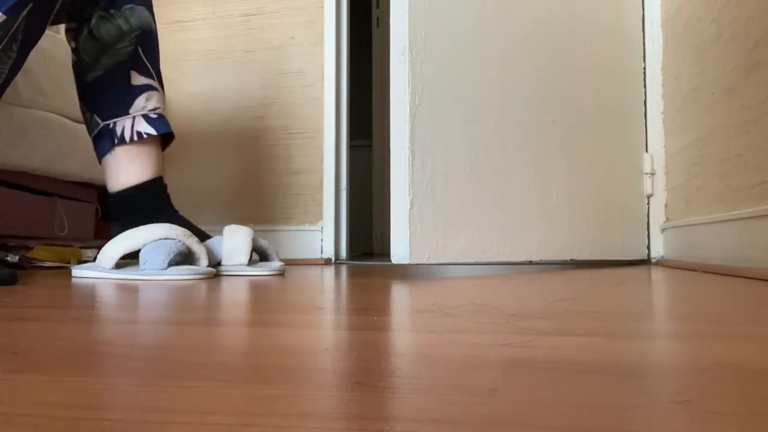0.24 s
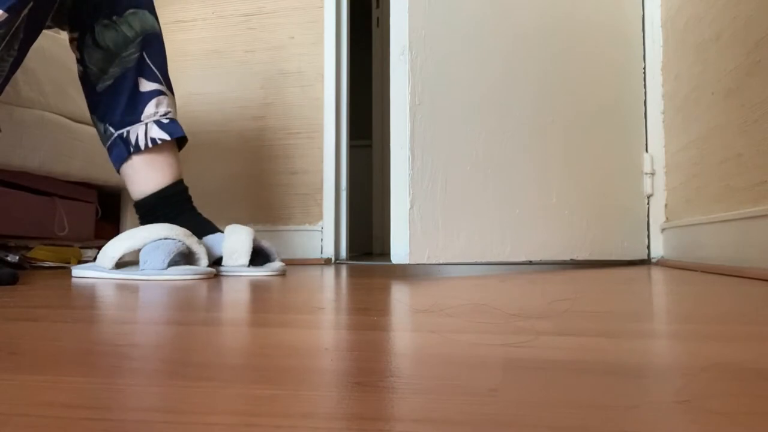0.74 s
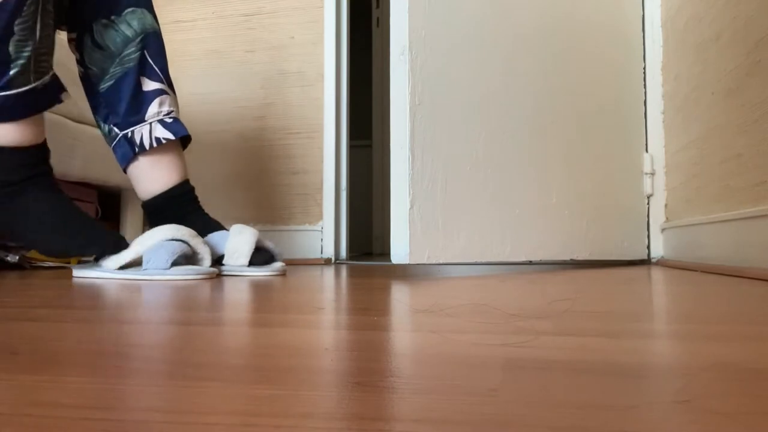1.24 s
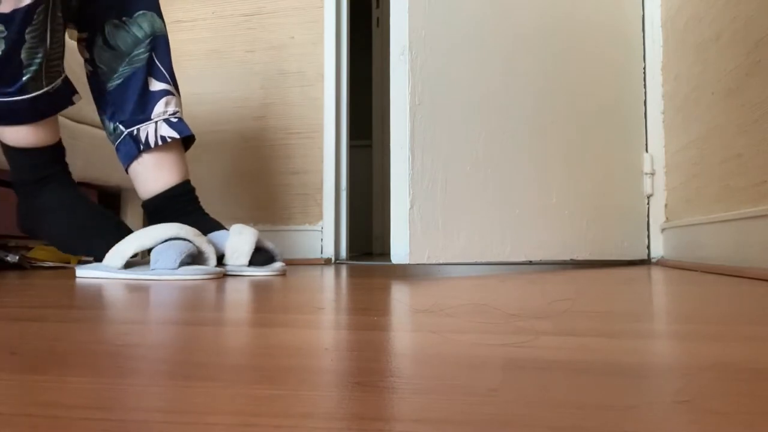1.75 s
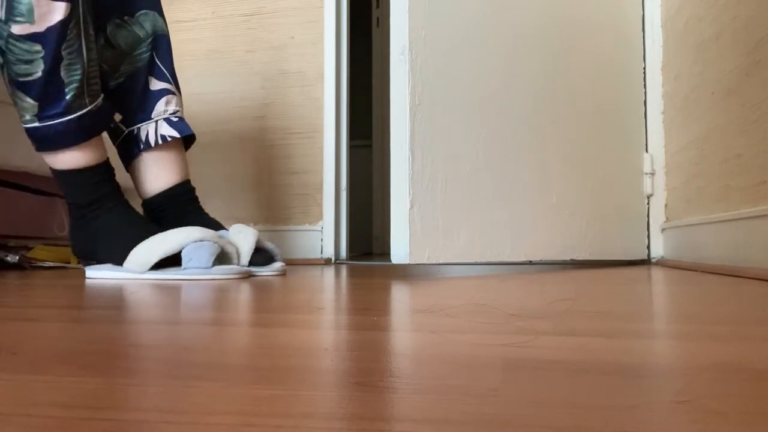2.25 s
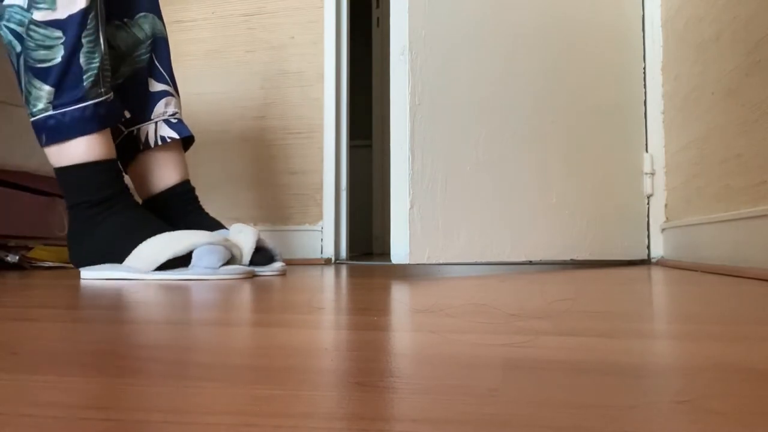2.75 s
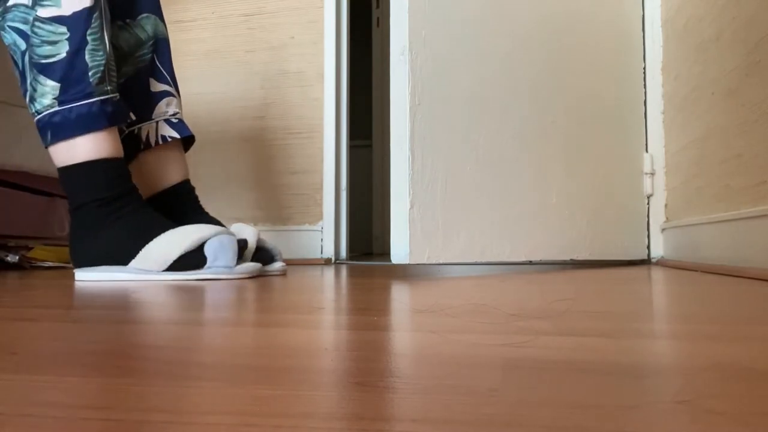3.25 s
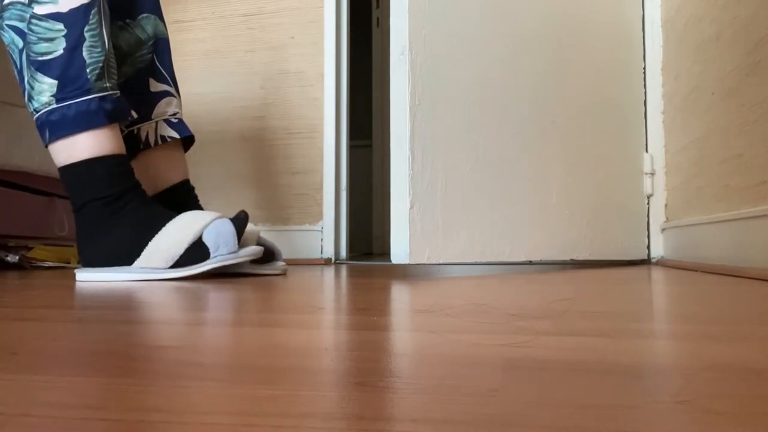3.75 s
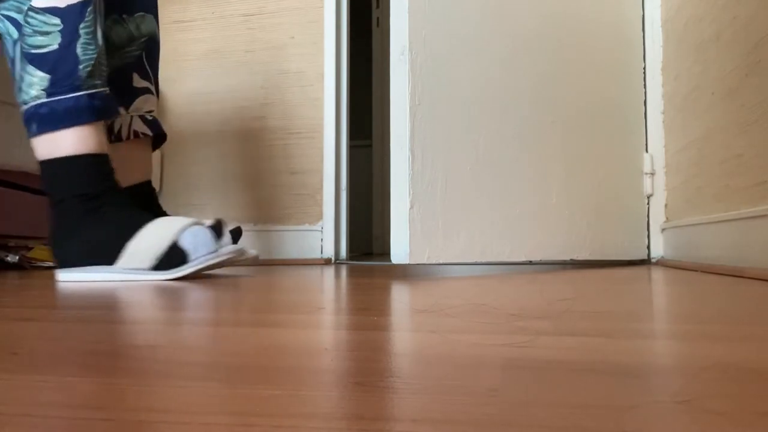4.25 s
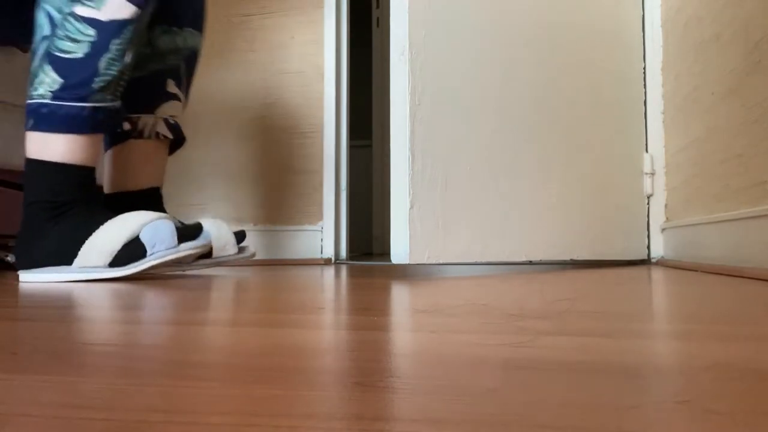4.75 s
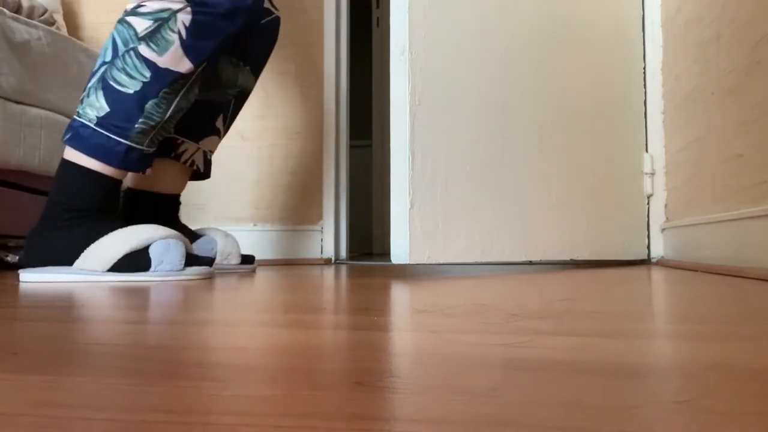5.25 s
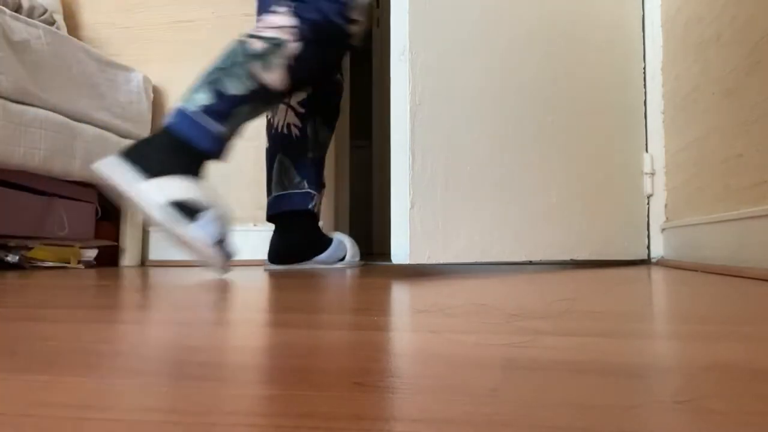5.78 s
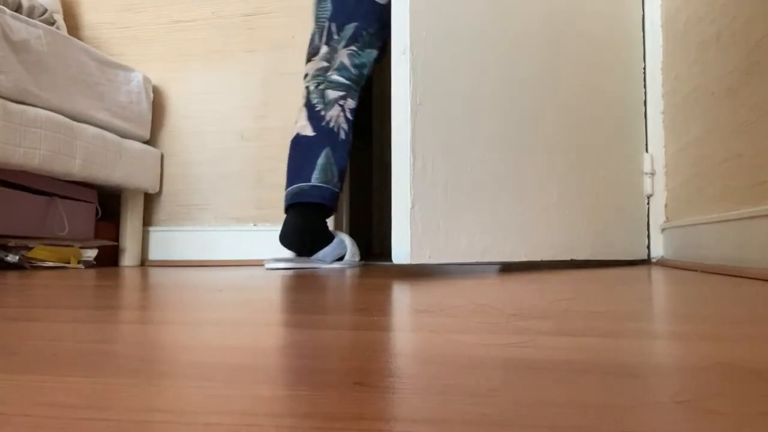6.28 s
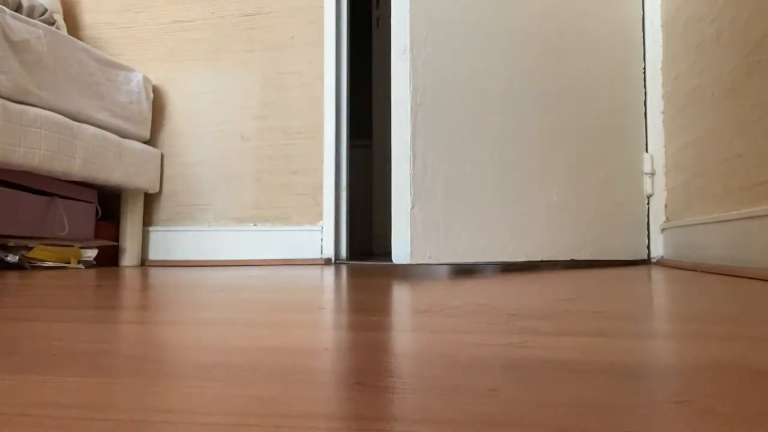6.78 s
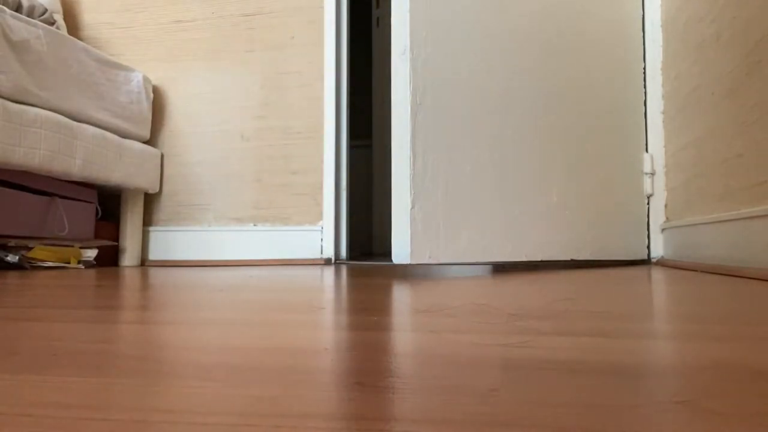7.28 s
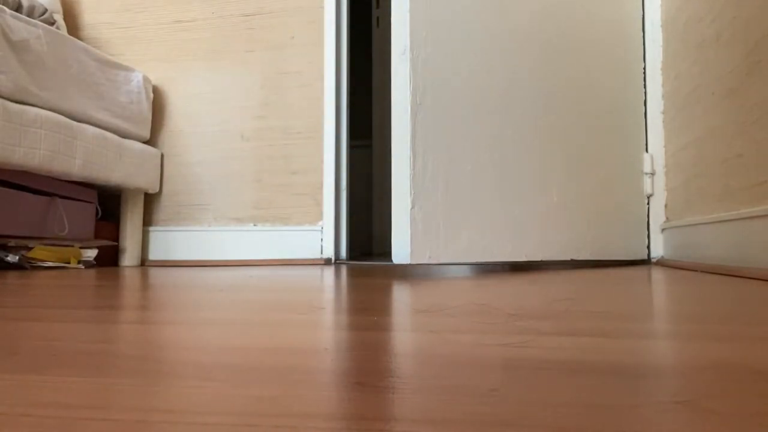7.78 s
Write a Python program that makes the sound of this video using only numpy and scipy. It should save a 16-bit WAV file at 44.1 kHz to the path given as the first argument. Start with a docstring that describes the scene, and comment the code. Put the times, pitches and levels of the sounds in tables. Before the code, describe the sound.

Two microphones near the floor catch very quiet fabric hisses and padded thuds as feet slide into slippers. Joints in the boards tick and crack midway and again before walking begins. Then come quick gritty scuffs, light slaps and a crisp double clack, followed by softer steps moving off. The small room answers with a short reverberation over a barely audible low traffic drone.

```python
"""Slippers on a laminate floor

Socked feet work their way into soft slippers on a laminate floor, then shuffle off across the boards.
Cloth and scuffs are shaped noise; pats, cracks and slaps are short pulses that the boards carry to two
microphones, treble first. The small room rings briefly with decaying noise.
A low drone of swept tones, like an engine outdoors, and a rumble of noise come through the walls."""
import sys
import numpy as np
from scipy import signal
from scipy.fft import rfft, irfft, next_fast_len
from scipy.io import wavfile

SR = 44100
rng = np.random.default_rng(int(sys.argv[2]) if len(sys.argv) > 2 else 0)


def digitize_waveform(pressure):
    """Quantize a signal to 16-bit integers and store it at the path in sys.argv[1].

    Rows of a 2-D input are taken as channels; values are limited to [-1, 1].
    """
    field = np.atleast_2d(pressure).T
    bounded = np.clip(field, -1, 1)
    quanta = np.round(bounded * 32767).astype(np.int16)
    wavfile.write(sys.argv[1], SR, quanta)


N = 353814
TIME = np.arange(N) / SR

# Drone like a distant engine. Each row: time in seconds, pitch in Hz, relative level in dB.
DRONE = [(0, 33.06, -65), (.78, 34, -68), (.9, 35.24, -52.5), (1.08, 36.55, -47.5), (1.42, 37.66, -50),
         (1.52, 39.8, -54.5), (2.05, 45, -55), (2.6, 47.4, -50), (3.0, 47.3, -51), (3.18, 46.9, -55.5),
         (3.42, 45.67, -45), (3.75, 46.23, -50), (4.15, 45, -64.5), (6.3, 45.3, -56), (8.02, 45, -68)]
# Resonances through which the drone enters the room. Each row: pitch in Hz, width in Hz, gain in dB.
WALL_MODES = [(46.3, 11, -0.5), (71.37, 6.5, 10.5)]
# Low notes of the room, stirred by traffic. Each row: pitch in Hz, width in Hz, relative level in dB.
ROOM_MODES = [(45, 1.5, -62), (67.64, 4.7, -54.5), (78.7, 9.6, -60), (152, 5.1, -64.5), (177.9, 9.9, -67)]
# Strength of the traffic over time. Each row: time in seconds, relative level in dB.
TRAFFIC = [(.2, -52.5), (.75, -64.5), (2.0, -57.5), (2.6, -55.5), (4.15, -60), (4.55, -52.5), (5.9, -59.5),
           (6.7, -51), (7.3, -57), (8.02, -53.5)]
# Tone of the faint room noise. Each row: frequency in Hz, relative level in dB.
AIR_COLOUR = [(50, -21.5), (90, -6), (125, -9), (180, -19), (280, -18), (400, -25), (800, -27.5),
              (1300, -35), (2300, -44.5), (5000, -50), (10000, -49), (15000, -58)]
# Soles dragged over the boards. Each row: fastest moment in seconds, length in seconds,
# relative level in dB, pitch of the hollow body in Hz, grip in dB.
SCUFFS = [(.008, 0.013, -61.5, 600, 2), (0.132, 0.047, -75, 1300, -12), (0.226, 0.035, -65.5, 600, 9.5),
          (0.264, 0.014, -64, 990, -8), (0.48, 0.094, -75, 1200, -8), (0.586, 0.0081, -64, 550, 5.5),
          (1.349, 0.068, -81.5, 600, 12.5), (1.992, 0.082, -70.5, 646, 5.5), (3.412, 0.042, -70, 1650, -2),
          (4.326, 0.094, -59, 695, -3), (4.431, 0.013, -60, 2440, -6), (4.447, 0.039, -69.5, 974, -23),
          (5.412, 0.045, -57.5, 806, 10), (5.433, 0.017, -47.5, 1410, -12.5),
          (5.452, 0.015, -45.5, 1800, 1), (5.473, 0.054, -58.5, 600, -8), (5.54, 0.041, -44.5, 1050, 5.5),
          (5.583, 0.027, -51.5, 640, 7), (5.653, 0.078, -63, 655, -2.5), (6.007, 0.058, -68, 660, 2.5),
          (6.234, 0.063, -59.5, 870, -8.5), (6.515, 0.066, -73, 600, 10.5),
          (6.724, 0.042, -85.5, 842, -20.5), (7.141, 0.027, -51.5, 740, 5), (7.185, 0.0094, -47, 1650, 8.5),
          (7.367, 0.073, -72, 3013, -2.5), (7.834, 0.048, -70.5, 470, -13), (7.972, 0.027, -55, 685, -5)]
# Tone of the scuffing grit. Each row: frequency in Hz, relative level in dB.
SCUFF_COLOUR = [(120, -38.5), (200, -21.5), (390, -1.5), (580, -3.5), (880, -4.5), (1700, -8), (2400, -9),
                (4000, -14.5), (5500, -16.5), (8800, -18), (13000, -28), (15000, -40.5)]
# Socks and trousers sliding. Each row: fastest moment in seconds, length in seconds, relative level in dB.
STROKES = [(.135, 0.091, -78.5), (0.236, 0.039, -59.5), (.5, 0.11, -73), (0.608, 0.054, -76),
           (0.76, 0.053, -70.5), (0.879, 0.091, -66.5), (1.075, 0.098, -72.5), (1.353, .053, -73),
           (1.995, 0.098, -69), (2.221, 0.074, -63), (2.453, 0.11, -64), (2.652, 0.049, -66.5),
           (2.868, 0.13, -64), (3.134, 0.059, -65.5), (3.205, 0.068, -68.5), (3.309, 0.076, -73),
           (3.437, 0.12, -63), (3.598, 0.02, -67), (3.692, 0.094, -68), (3.834, 0.028, -70.5),
           (3.91, 0.029, -71), (4.072, 0.22, -71.5), (4.337, 0.16, -56.5), (4.572, 0.05, -62.5),
           (4.718, 0.1, -67.5), (4.798, 0.19, -60.5), (4.936, 0.12, -69), (5.096, 0.11, -64),
           (5.311, 0.14, -68.5), (5.779, 0.081, -60), (6.013, 0.083, -72.5), (6.479, 0.14, -67),
           (7.19, 0.059, -57), (7.277, 0.18, -68.5)]
# Tone of the cloth's hiss. Each row: frequency in Hz, relative level in dB.
HISS_COLOUR = [(600, -15.5), (1200, 2), (2000, 2), (3500, -3.5), (5700, -7.5), (8300, -5.5), (11500, -14.5),
               (13500, -14), (15000, -28.5)]
# Tone of the low rub on the padded soles. Each row: frequency in Hz, relative level in dB.
RUB_COLOUR = [(100, -24), (220, 0.5), (390, -3), (500, -5.5), (680, -0.5), (1000, -3.5), (1700, -6.5),
              (2600, -16), (5000, -63)]
# Board joints cracking under the weight. Each row: time in seconds, relative level in dB, knock pitch in Hz.
CRACKS = [(2.991, -45.5, 1130), (3.286, -52.5, 1000), (3.342, -48.5, 1300), (3.3626, -37, 984),
          (3.382, -43.5, 1470), (3.4014, -35, 1370), (3.415, -50, 1400), (4.735, -35, 1930),
          (4.738, -30.5, 1350), (4.752, -41, 1400), (4.767, -41, 1400)]
# Slippers slapping and flicking the boards. Each row: time in seconds, relative level in dB,
# treble tilt in dB per octave.
SLAPS = [(0.2457, -39, -1), (0.3837, -63, 2), (0.5877, -42, 15), (3.187, -46, 16), (3.819, -54, 5),
         (3.88, -52.5, 1.5), (5.315, -37, -5), (5.453, -39.5, -4), (5.652, -42.5, 3.5), (5.691, -31, -3.5),
         (5.802, -37, 6), (5.814, -37, -1), (6.192, -35, -3.5), (6.3069, -22, 2), (6.3106, -30, -1.5),
         (6.321, -22, 3), (6.3237, -28, 5.5), (7.123, -46.5, -1.5), (7.196, -37, 2.5), (7.956, -35, 0)]
# Tone of a hard contact. Each row: frequency in Hz, relative level in dB.
SNAP_COLOUR = [(150, -11.5), (400, 1), (850, 1.5), (1400, 1), (2100, -2.5), (3000, -2), (5500, -11.5),
               (8000, -11.5), (14000, -32)]
# Soft pats of heel and sole. Each row: time in seconds, relative level in dB, pitch of the thud in Hz.
PATS = [(.2475, -29, 560), (.386, -46.5, 570), (.55, -45.5, 670), (.589, -51, 494.6), (.876, -55.5, 600),
        (1.017, -49.5, 472.6), (1.267, -52, 536), (2.426, -49, 650), (2.604, -48, 580), (2.992, -48, 484),
        (3.133, -51.5, 487), (3.334, -44, 540), (3.472, -47, 720.6), (3.582, -47, 686), (3.918, -53, 618),
        (4.006, -48, 600), (4.887, -49, 563), (4.907, -48, 485), (5.474, -44, 557), (5.653, -51, 630),
        (5.707, -39, 656), (6.24, -45, 850), (6.323, -35, 900), (6.424, -48, 460), (6.705, -47.5, 703),
        (7.065, -44.5, 480), (7.134, -42, 493), (7.151, -43, 480.4), (7.813, -48, 474), (7.936, -42.5, 502),
        (7.959, -39.5, 603)]
# Tone of a pat. Each row: multiple of the thud pitch, relative level in dB.
PAT_COLOUR = [(.16, -29.5), (.32, -14), (.6, -8.5), (.88, -0.5), (1.15, -0.5), (1.7, -16), (2.5, -23.5),
              (4.4, -60), (14, -54.5)]
# The floor takes the body's weight. Each row: heaviest moment in seconds, length in seconds,
# relative level in dB.
LOADS = [(0.256, 0.031, -49), (3.398, 0.027, -47.5), (4.937, 0.15, -56.5), (5.5, 0.19, -55.5),
         (6.23, 0.075, -58.5), (6.356, 0.049, -61), (7.975, 0.033, -60)]
# Tone of the loaded floor. Each row: frequency in Hz, relative level in dB.
LOAD_COLOUR = [(40, -13), (75, 3), (115, 3), (190, -4.5), (280, -3), (500, -43)]
# Where the feet are. Each row: time in seconds, travel time through the boards at 1 kHz in seconds,
# lead of the left microphone in seconds, extra ring of the boards in dB.
FEET = [(3.4, .002, 0.00086, 0.5), (4.7, .0045, 0.0012, 8), (5.7, 0.0044, 0, -4),
        (6.352, .0054, 0.0019, 1.5), (7.0, 0.0031, 0.00054, -6)]
# Resonances of the floor. Each row: pitch in Hz, width in Hz, gain in dB.
BOARDS = [(523, 120, -4.5), (618, 160, -8.5), (4370, 1700, -3.5)]
# How the room dies away. Each row: frequency in Hz, time to fall by 60 dB in seconds, relative level in dB.
ROOM_DECAY = [(150, 0.51, -0.5), (600, 0.43, 2.5), (2030, 0.32, 1.5), (5000, 0.21, 4.5), (14000, 0.25, 3.5)]
# Left minus right sensitivity. Each row: frequency in Hz, difference in dB.
PORT_BALANCE = [(40, -6.5), (70, -3), (130, -6), (500, -7), (1000, -4), (2000, -2), (4000, -2.5),
                (8000, -0.5)]

PORT_LEAD_S = .00028  # lead of the left microphone for cloth and loads
RING_HZ, RING_WIDTH_HZ = 4030, 530  # the bright ring of the laminate
SWELL_SHARE = 0.45  # part of a slide spent speeding up
RUB_DB, RUB_GROWTH = -24, 0.58  # the rub grows more slowly than the hiss: offset in dB, dB per dB
BODY_DB, BODY_PER_GRIP = 9.5, -0.46  # body of a scuff at no grip (dB), and its change per dB of grip
RASP_DB = 11  # rasp of a scuff at a grip of 0 dB, before the ring of the place
CRACK_TILT_DB, CRACK_RING_DB = -6, -3.5  # treble tilt per octave; ring of the boards
SLAP_KNOCK_HZ, SLAP_RING_DB = 880, 7
# an ordinary pat; its edge and its settling relative to the thud (dB); the wait before it settles (s)
PAT_DB, EDGE_DB, SETTLE_DB, SETTLE_AFTER_S = -45, -16, -5.5, .009
EDGE_PER_DB, SETTLE_PER_DB = 0.18, -0.22  # louder pats have more edge and settle less (dB per dB)
EDGE_RING_DB, EDGE_HZ_PER_DB = 3.5, 700.5  # the edge rings a little; padding takes 1 dB per 700.5 Hz
TOP_HZ = 14600


def undb(db):
    """Turn decibels into a gain."""
    return 10 ** (np.asarray(db) / 20)


def unit(x):
    """Scale to an average (rms) strength of 1."""
    return x / np.sqrt(np.mean(x ** 2) + 1e-20)


def curves(rows):
    """Join each column of a table by straight lines in time."""
    times, *columns = np.transpose(rows)
    return [np.interp(TIME, times, column) for column in columns]


def freqs(size):
    """Frequencies in the spectrum of this many samples, at least 1 Hz."""
    return np.maximum(np.fft.rfftfreq(size, 1 / SR), 1)


def along(points, hz):
    """Read a table of frequencies and values on a log-frequency axis."""
    f, value = np.transpose(points)
    return np.interp(np.log(hz), np.log(f), value)


def colour(x, points):
    """Give a sound a tone from a table, with strength 1."""
    return unit(irfft(rfft(x) * undb(along(points, freqs(N))), N))


def resonance(hz, centre, width):
    """Response of one damped vibration, 1 at its centre."""
    return 1 / (1 + 1j * (hz ** 2 - centre ** 2) / (hz * width))


def walk(rate):
    """Smooth random wander with a spread near 1; rate is new values per second."""
    return np.interp(TIME * rate, np.arange(N), rng.standard_normal(N))


def add(track, s, sound):
    """Mix a stereo sound in at a time."""
    i = max(int(s * SR), 0)
    track[:, i:i + sound.shape[1]] += sound[:, :max(N - i, 0)]


def ports(x, lead_s):
    """Two microphones hear a sound a moment apart; a positive lead puts the left one first."""
    late = np.pad(x, (int(round(abs(lead_s) * SR)), 0))[:len(x)]
    return np.array([x, late] if lead_s > 0 else [late, x])


def feet(s):
    """Travel time, left lead and ring of the boards for where the feet are."""
    times, *columns = np.transpose(FEET)
    return [np.interp(s, times, column) for column in columns]


def stroke(s, length):
    """Speed of one slide: it swells to 1 and fades."""
    speed = np.zeros(N)
    near = slice(*np.searchsorted(TIME, [s - .5, s + .5]))
    t = TIME[near] - s
    share = np.clip(SWELL_SHARE, .1, .9)
    width = length * np.where(t < 0, share, 1 - share)
    speed[near] = np.exp(-.5 * np.minimum(np.abs(t) / width, 10) ** 2)
    return speed


def friction(rate, spread_db, catch_db):
    """Fibres catch and let go: dense slips of uneven size, in uneven bunches."""
    slips = (rng.random(N) < rate / SR) * rng.standard_normal(N)
    size_db = spread_db * np.minimum(rng.exponential(size=N), 5)
    return unit(slips * undb(size_db + catch_db * walk(90)))


def causal(db):
    """Spectrum of the pulse that has these levels and comes as promptly as possible."""
    cepstrum = irfft(np.log(undb(db)))
    half = len(cepstrum) // 2
    cepstrum[1:half] *= 2
    cepstrum[half + 1:] = 0
    return np.exp(rfft(cepstrum))


def blow(db, travel_s, size=4096):
    """A blow through the floor: bending waves go faster at higher pitch, so treble comes first."""
    delay_phase = 4 * np.pi * travel_s * np.sqrt(1000 * freqs(size))  # speed grows as the root of frequency
    fade = np.hanning(2 * size)[size:]
    pulse = irfft(causal(db) * np.exp(-1j * delay_phase)) * fade
    return pulse / np.sqrt(np.sum(pulse ** 2) / (.002 * SR))  # energy of 2 ms at strength 1


def scatter(pulse, decay_s):
    """Smear a pulse into many small ones that die away."""
    size = len(pulse)
    fade = np.exp(-np.arange(size) / SR / decay_s)
    contacts = unit(rng.standard_normal(size) * fade) / np.sqrt(size)
    return signal.fftconvolve(pulse, contacts)[:size]


def drone():
    """An engine-like tone changes speed and booms as its two harmonics cross the wall resonances."""
    hz, level_db = curves(DRONE)
    phase = 2 * np.pi * np.cumsum(hz) / SR
    engine = np.zeros(N)
    for k in (1, 2):
        for f, width, db in WALL_MODES:
            engine += undb(db) * np.abs(resonance(k * hz, f, width)) ** 2 * np.sin(k * phase)
    return np.sqrt(2) * engine * undb(level_db + .7 * walk(18))


def traffic(ceiling_db=-50):
    """Traffic stirs the low notes of the room: noise through narrow resonances, rising and falling."""
    modes = np.zeros(N)
    for f, width, db in ROOM_MODES:
        response = resonance(freqs(N), f, 2 * width) ** 2
        modes += undb(db) * unit(irfft(rfft(rng.standard_normal(N)) * response, N))
    swell_db = np.minimum(curves(TRAFFIC)[0], ceiling_db) - ceiling_db
    return modes * undb(0.83 * swell_db + 3.5)


def air():
    """Faint room noise, partly shared by both microphones."""
    noise = rng.standard_normal((2, N)) + 0.35 * rng.standard_normal(N)
    return colour(noise, AIR_COLOUR) * undb(-63.5 + .6 * walk(1.6))


def scuffs(body_width=0.52, size=16384):
    """A sole slides and stops; more grip gives less hollow body and more bright rasp of the boards."""
    grit = colour(friction(rate=3000, spread_db=1.6, catch_db=2.5), SCUFF_COLOUR)
    hz, out = freqs(size), np.zeros((2, N))
    for s, length, db, body_hz, grip_db in SCUFFS:
        start = max(int((s - 2 * length) * SR), 0)
        slide = (grit * stroke(s, length))[start:start + size]
        _, lead_s, place_db = feet(s)
        body_gain = undb(BODY_DB + BODY_PER_GRIP * grip_db)
        body = body_gain * np.abs(resonance(hz, body_hz, body_width * body_hz))
        rasp = undb(RASP_DB + grip_db + place_db) * np.abs(resonance(hz, RING_HZ, RING_WIDTH_HZ))
        sound = irfft(rfft(slide, size) * np.sqrt(1 + body ** 2 + rasp ** 2))
        add(out, start / SR, ports(sound * undb(db), lead_s))
    return out


def cloth(grip_hz=10000, grip_db=-62):
    """Socks hiss along the straps and rub the padded soles; firm strokes are brighter."""
    hiss = colour(friction(rate=12000, spread_db=0.5, catch_db=2.5), HISS_COLOUR) * undb(-1.5)
    rub = colour(friction(rate=2500, spread_db=2.5, catch_db=0.4), RUB_COLOUR) * undb(-4.0)
    hiss_gain, rub_gain = np.zeros(N), np.zeros(N)
    for s, length, db in STROKES:
        speed = stroke(s, length)
        hiss_gain += undb(db) * speed
        rub_gain += undb(RUB_DB + RUB_GROWTH * db) * speed
    sheen_filter = signal.butter(2, grip_hz, "highpass", fs=SR, output="sos")
    sheen = signal.sosfiltfilt(sheen_filter, hiss)
    firmness = hiss_gain / (hiss_gain + undb(grip_db))
    return ports(hiss_gain * (hiss + 4.0 * firmness * sheen) + rub_gain * rub, PORT_LEAD_S)


def snap(s, tilt_db, knock_hz, ring_db, knock_db=7, bass_db=3.5, scatter_db=-1, size=4096):
    """A hard contact knocks and rings the laminate; plank joints scatter it differently to each side."""
    hz = freqs(size)
    travel_s, lead_s, place_db = feet(s)
    ring = np.abs(resonance(hz, RING_HZ, RING_WIDTH_HZ))
    knock = np.abs(resonance(hz, knock_hz, 0.12 * knock_hz))
    treble = tilt_db * np.log2(np.maximum(hz, knock_hz) / 2000)
    bass = bass_db * np.clip(np.log2(hz / knock_hz), -3, 0)
    tone_db = along(SNAP_COLOUR, hz) + treble + bass + knock_db * knock + (ring_db + place_db) * ring
    wave = blow(tone_db, travel_s)
    scattered = np.array([scatter(wave, decay_s=0.0047) for _ in range(2)])
    return ports(wave, lead_s) + undb(scatter_db) * scattered


def snaps(crack_db=-5.0, slap_db=-7.0):
    """Board joints crack dully under the weight; slapping soles ring the laminate brightly."""
    out = np.zeros((2, N))
    for s, db, knock_hz in CRACKS:
        add(out, s, undb(db + crack_db) * snap(s, CRACK_TILT_DB, knock_hz, CRACK_RING_DB))
    for s, db, tilt_db in SLAPS:
        add(out, s, undb(db + slap_db) * snap(s, tilt_db, SLAP_KNOCK_HZ, SLAP_RING_DB))
    return out


def pats(size=4096):
    """Dull padded pats with a faint edge, after which the sole settles in many small contacts."""
    hz, out = freqs(size), np.zeros((2, N))
    ring_db = EDGE_RING_DB * np.abs(resonance(hz, RING_HZ, RING_WIDTH_HZ))
    edge = blow(along(SNAP_COLOUR, hz) + ring_db - hz / EDGE_HZ_PER_DB, travel_s=0.002)
    for s, db, thud_hz in PATS:
        _, lead_s, place_db = feet(s)
        edge_db = EDGE_DB + EDGE_PER_DB * (db - PAT_DB) + place_db
        settle_db = SETTLE_DB + SETTLE_PER_DB * (db - PAT_DB)
        thud = blow(along(PAT_COLOUR, hz / thud_hz), travel_s=0.0015)
        contact = thud + undb(edge_db) * scatter(edge, decay_s=0.0047)
        settling = scatter(thud, decay_s=0.011)
        add(out, s, undb(db) * ports(contact, lead_s))
        add(out, s + SETTLE_AFTER_S, undb(db + settle_db) * ports(settling, lead_s))
    return out


def loads():
    """The floor rumbles dully as weight shifts onto a foot."""
    rumble = colour(rng.standard_normal(N), LOAD_COLOUR)
    weight = sum(undb(db) * stroke(s, length) for s, length, db in LOADS)
    return ports(rumble * weight, PORT_LEAD_S)


def reflections(early_db=-6, early_s=0.0049, late_db=-5, soft_hz=5000, size=32768):
    """Near walls answer at once, then the room dies away at a different rate in each pitch range."""
    hz, t = freqs(size), np.arange(size) / SR
    noise = rfft(rng.standard_normal((2, size)))
    tail = 0
    for k, (_, t60, wet_db) in enumerate(ROOM_DECAY):
        # each range fades into its neighbours
        share = along([(row[0], j == k) for j, row in enumerate(ROOM_DECAY)], hz)
        tail = tail + irfft(noise * share) * undb(wet_db - 60 * t / t60)
    sparse = rng.random((2, size)) < .1
    near = rng.standard_normal((2, size)) * sparse * np.exp(-t / early_s)
    # upholstery dulls the first echoes
    near = irfft(rfft(unit(near * (t > .0015))) / (1 + 1j * hz / soft_hz))
    return (undb(late_db) * unit(tail * (t > .006)) + undb(early_db) * near) / np.sqrt(size)


def room(x, count=10):
    """The boards colour everything; the pattern of echoes changes as the feet move."""
    boards = 1 + sum(undb(db) * resonance(freqs(N), f, width) for f, width, db in BOARDS)
    x = irfft(rfft(x) * boards, N) * undb(-0.5)
    out, hop = x.copy(), N // count
    for centre in np.arange(count + 1) * hop:
        # overlapping pieces, each with fresh echoes
        i = np.arange(max(centre - hop, 0), min(centre + hop, N))
        piece = x[:, i] * np.cos(np.pi / 2 * (i - centre) / hop)
        add(out, i[0] / SR, signal.fftconvolve(piece, reflections(), axes=1))
    return out


def scene():
    """Feet in the room, over its quiet background."""
    background = drone() + traffic() + air()
    steps = scuffs() + cloth() + snaps() + pats() + loads()
    return background + room(steps)


def record(dry, size=4096):
    """The left microphone is weaker, least so in the treble; a treble band and the very top are cut."""
    padded = next_fast_len(N + size, real=True)
    balance_db = along(PORT_BALANCE, freqs(padded))
    gains = undb(np.array([balance_db, -balance_db]) / 2)
    heard = irfft(rfft(dry, padded) * gains, padded)[:, :N]
    notch = signal.butter(3, [9700, 11300], "bandstop", fs=SR, output="sos")
    top_cut = signal.ellip(8, .2, 70, TOP_HZ, fs=SR, output="sos")
    return signal.sosfilt(top_cut, signal.sosfilt(notch, heard))


dry = scene()
out = record(dry)
digitize_waveform(out)
```